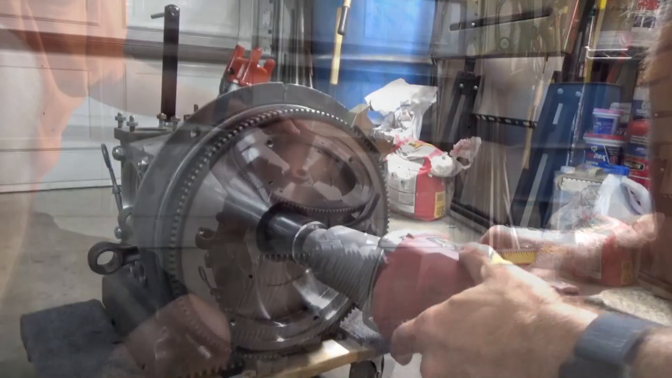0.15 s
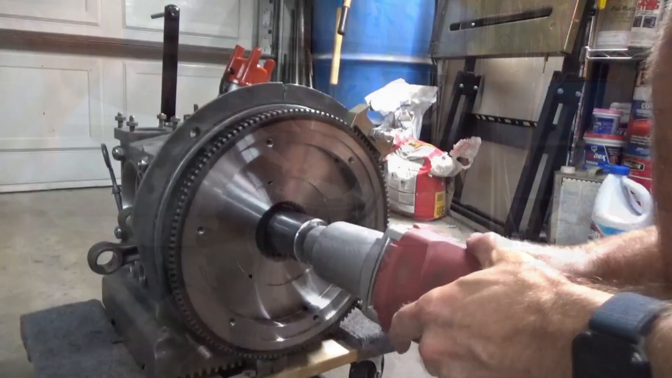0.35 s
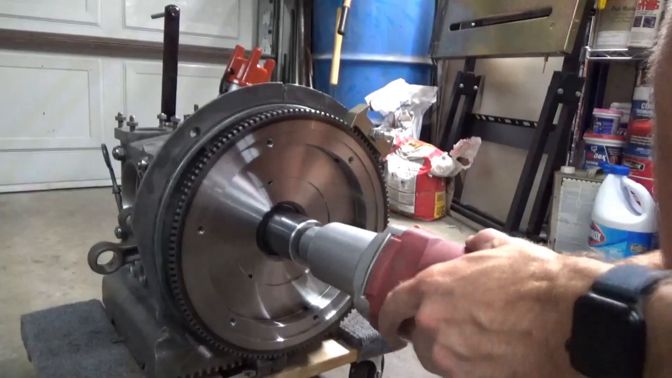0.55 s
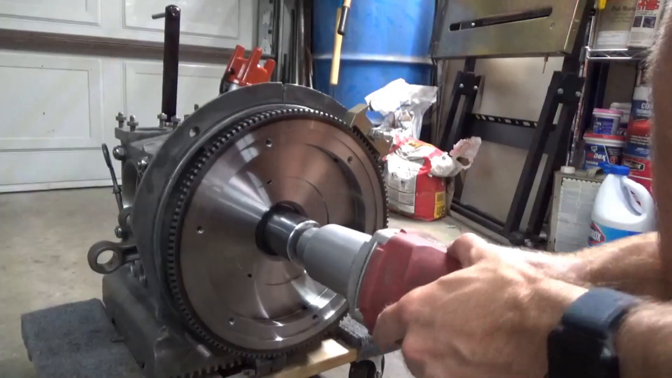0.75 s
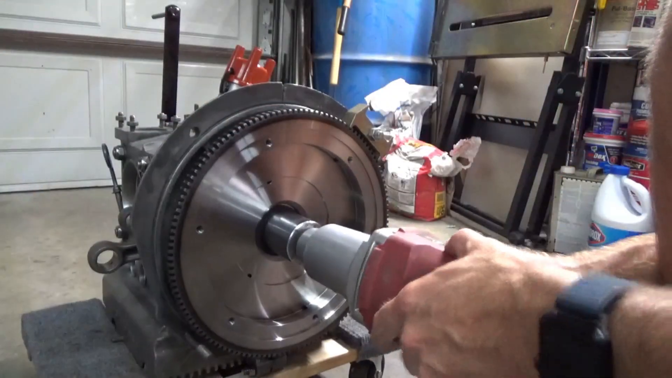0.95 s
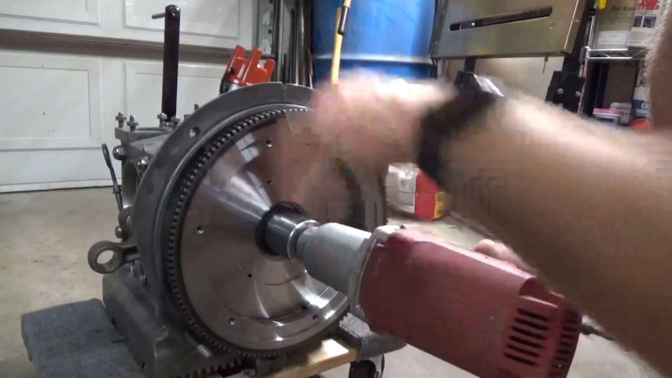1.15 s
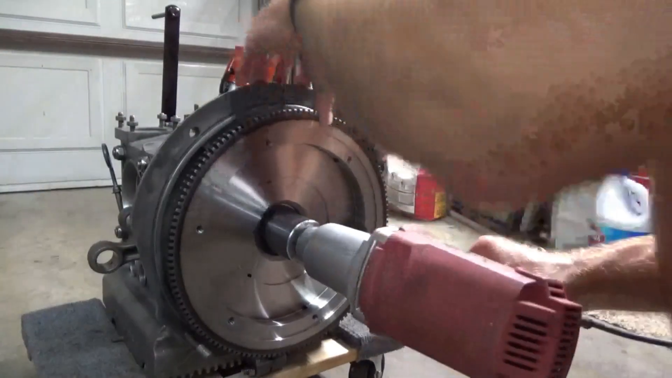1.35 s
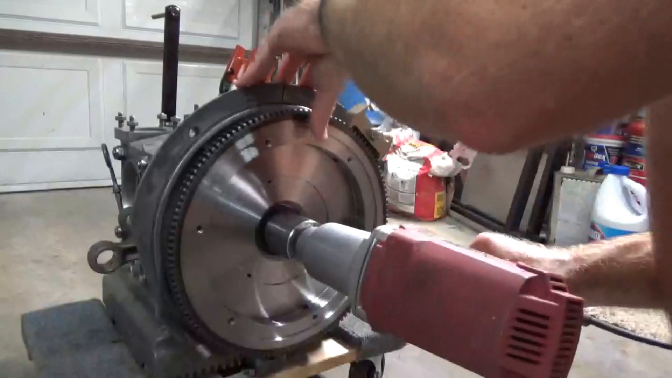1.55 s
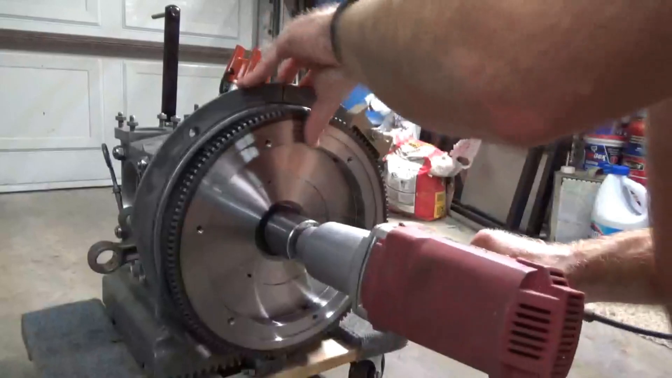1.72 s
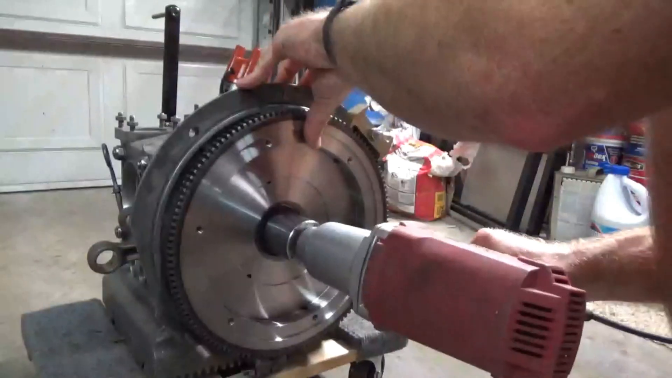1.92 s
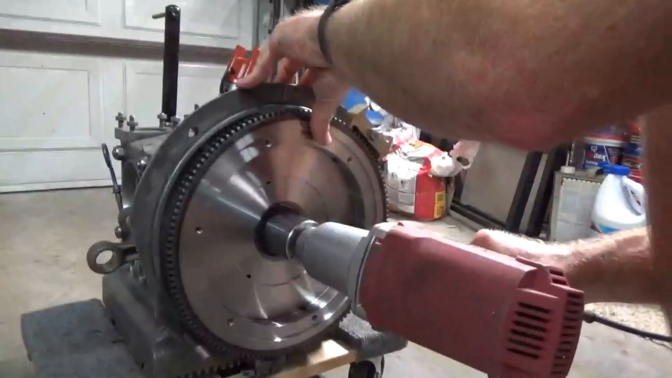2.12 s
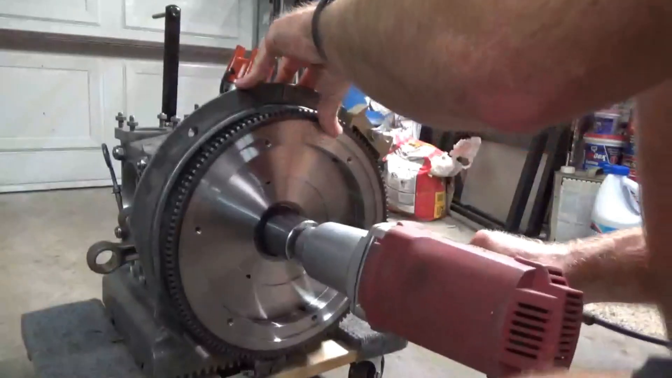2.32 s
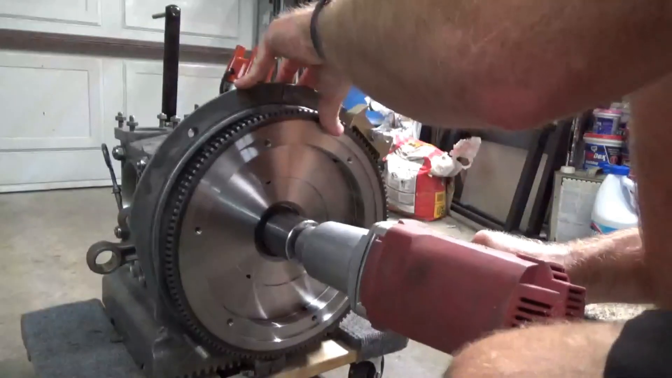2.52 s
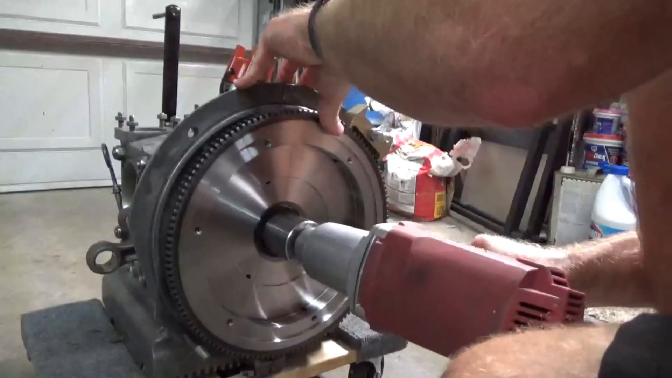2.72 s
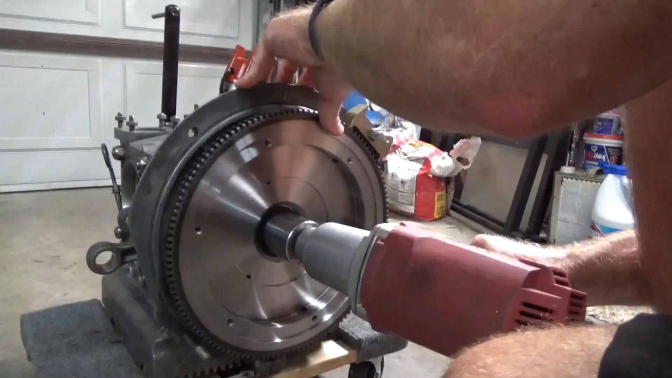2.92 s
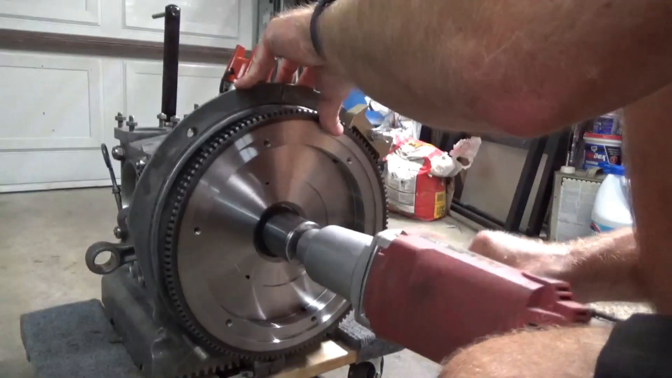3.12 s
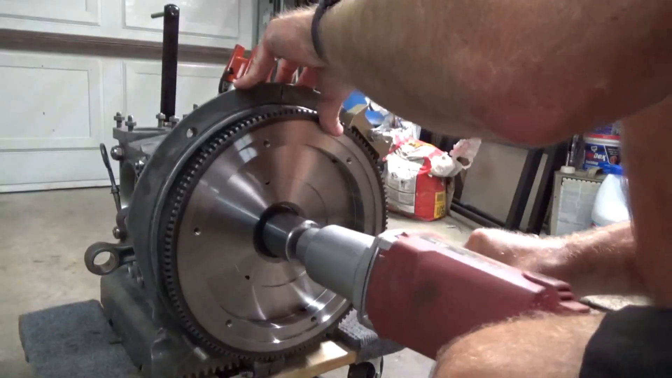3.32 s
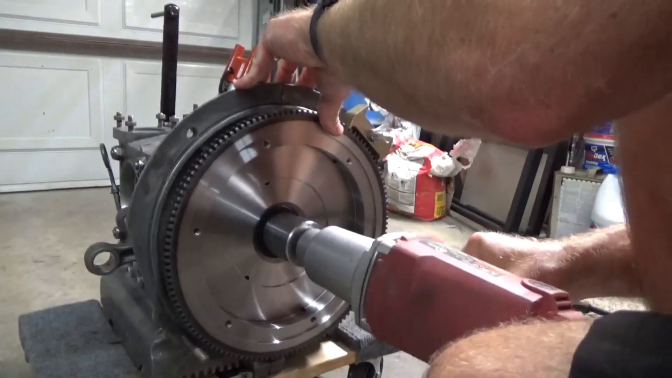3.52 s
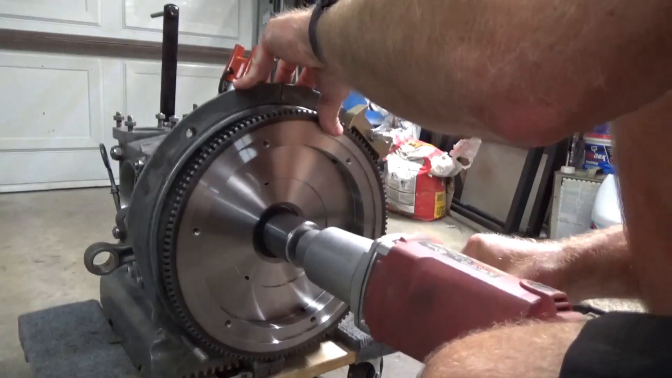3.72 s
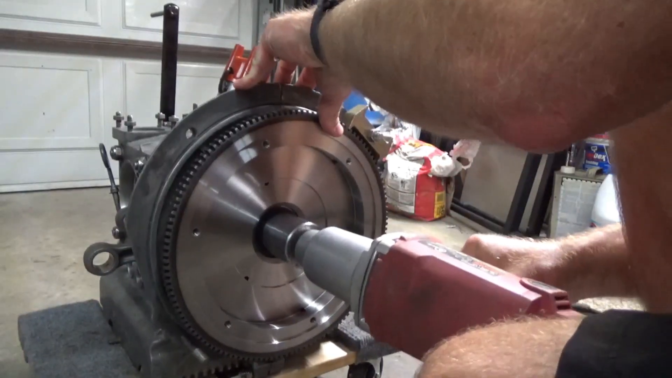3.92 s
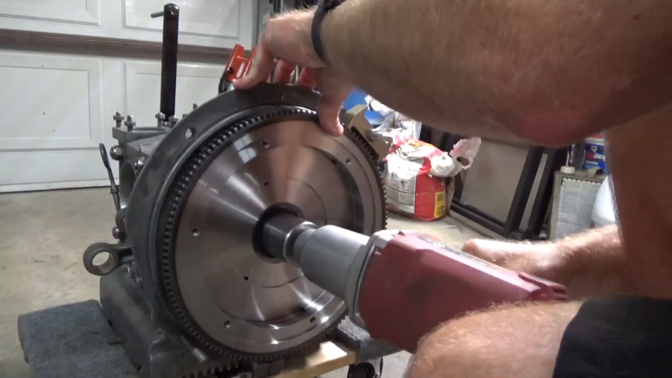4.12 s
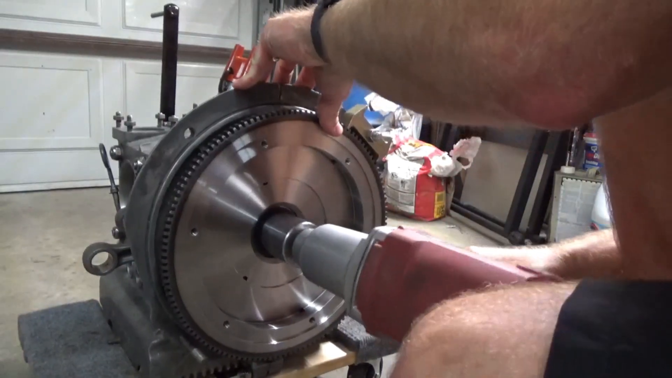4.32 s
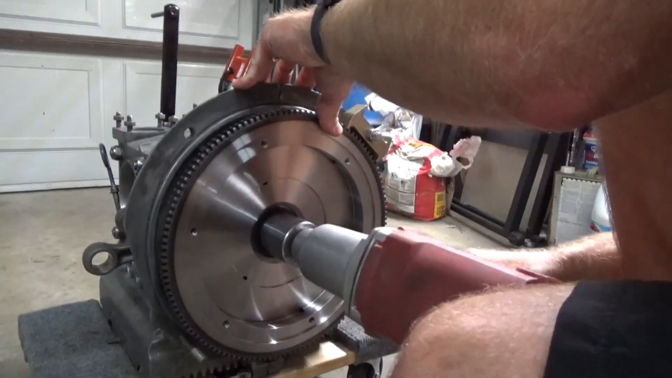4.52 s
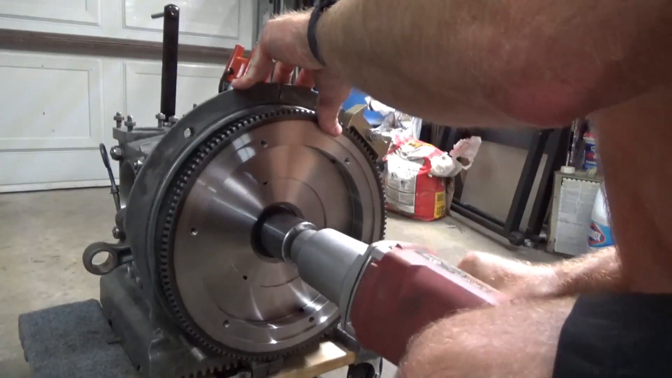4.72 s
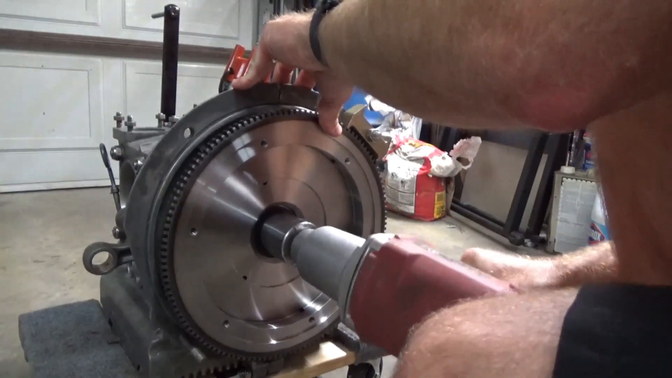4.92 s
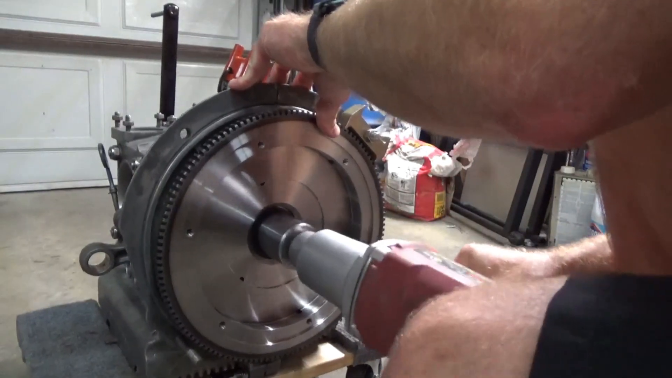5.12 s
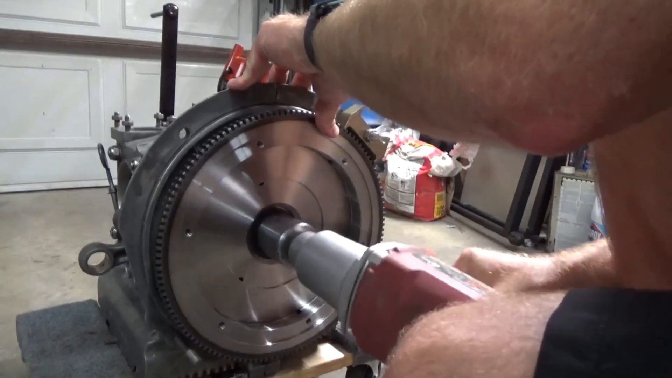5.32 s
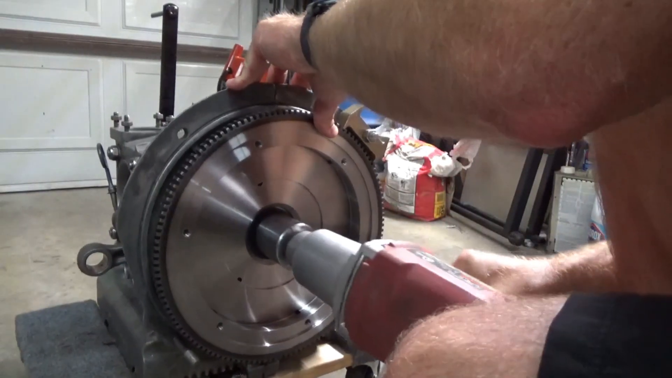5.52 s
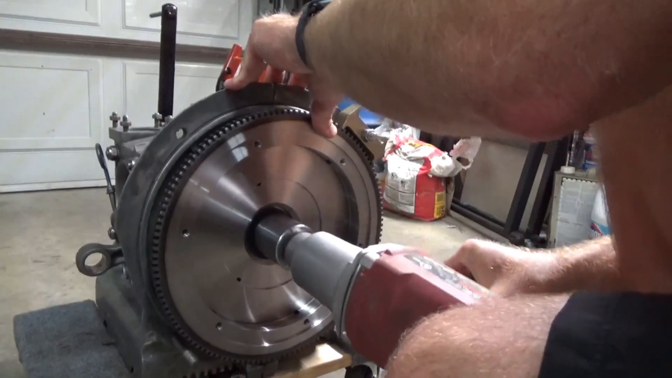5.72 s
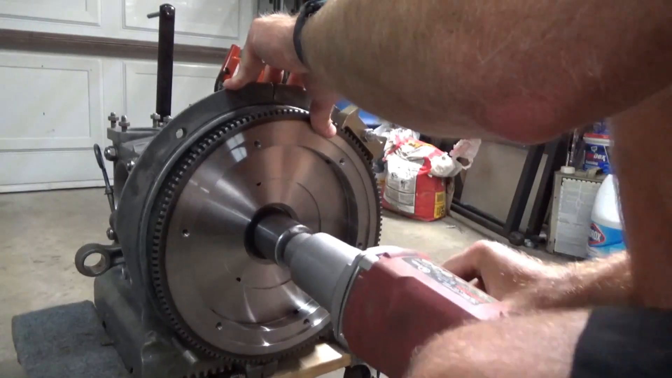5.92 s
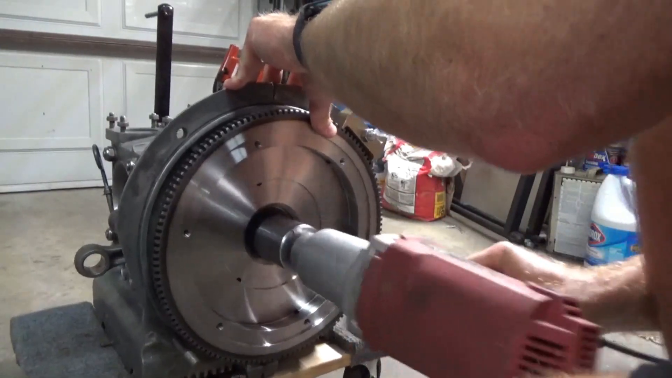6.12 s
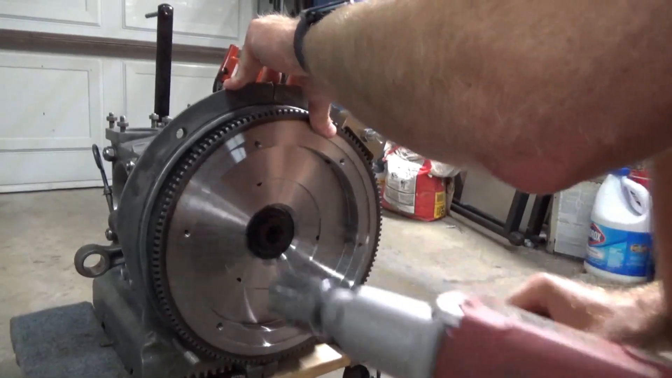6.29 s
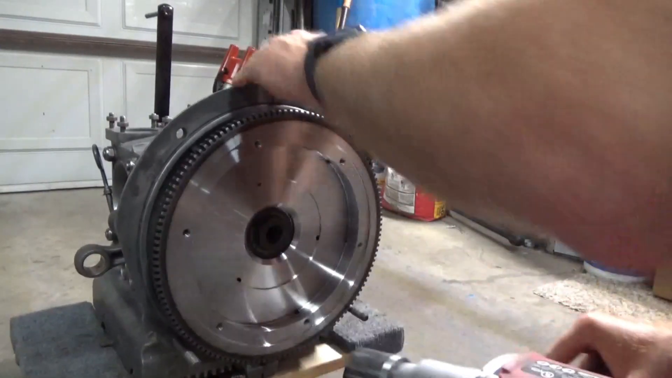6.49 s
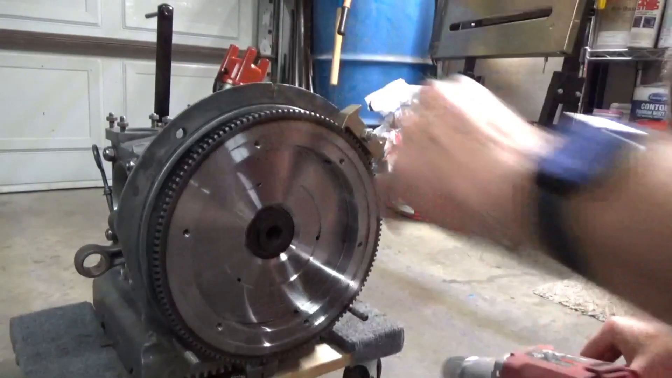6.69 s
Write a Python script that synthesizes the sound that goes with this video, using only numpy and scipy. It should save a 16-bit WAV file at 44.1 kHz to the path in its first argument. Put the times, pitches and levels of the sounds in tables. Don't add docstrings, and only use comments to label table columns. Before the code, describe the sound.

A stereo pickup close to the work in a hard-walled garage. Room air and a faint far-off compressor hum fade up. From 0 to 0.55 seconds small, dull steel clinks tick irregularly, with brief grating; at 0.57 the socket drops home with a bright, ringing double clack. Faint taps and soft skin-on-metal rubs follow around 1.0 to 1.5, scattered knocks to 1.9, then near quiet with tiny touches at 2.5. At 3.1 an impact wrench erupts: irregular catches, then harsh, even hammering at about 45 blows a second until 4.17, with motor rush, bright chatter and bassy shudder. Blows spread out and die by 4.55. A second burst starts at 4.94, hammers to 5.3 and slows to single clacks by 5.66. The background stays ducked. Short garage echoes fade while light clinks at 5.8 to 6.2 mark the tool's removal, with a last small tap at 6.68.

```python
import sys
import numpy as np
from scipy import signal
from scipy.fft import rfft, irfft
from scipy.io import wavfile
from scipy.ndimage import uniform_filter1d, minimum_filter1d

SR = 44100
rng = np.random.default_rng(int(sys.argv[2]) if len(sys.argv) > 2 else 0)


def gain_from_db(level_db):
    decades = np.asarray(level_db, float) / 20
    return 10 ** decades


def wav_out(sig):
    wavfile.write(sys.argv[1], SR, np.round(np.clip(np.atleast_2d(sig).T, -1, 1) * 32767).astype(np.int16))


N = 297664


def rms_one(x):
    return x / np.sqrt(np.mean(x ** 2) + 1e-20)


def curve(rows, outside=None):
    s, value = np.transpose(rows)
    return np.interp(np.arange(N) / SR, s, value, outside, outside)


def at_hz(points, hz, axis=1):
    return np.interp(np.log(hz + 1), np.log(np.array(points)[:, 0]), np.array(points)[:, axis])


def coloured(white, spectrum):
    gain = gain_from_db(at_hz(spectrum, np.fft.rfftfreq(N, 1 / SR)))
    return rms_one(irfft(rfft(white) * gain, N))


def drift(rate_hz):
    r = np.exp(-2 * np.pi * rate_hz / SR)
    white = rng.standard_normal(N + SR)
    return rms_one(signal.lfilter([1], [1, -2 * r, r * r], white)[SR:])


def band(x, low_hz, high_hz):
    return signal.sosfilt(signal.butter(3, [low_hz, high_hz], "band", fs=SR, output="sos"), x)


def soft_band(x, low_hz, high_hz):
    return signal.sosfilt(signal.butter(2, [low_hz, high_hz], "band", fs=SR, output="sos"), x)


def two_sides(mid, side, alike):
    return np.sqrt(1 + alike) * mid + np.sqrt(1 - alike) * side * [[1], [-1]]


def ring(force, hz, t60_s):
    r, w = gain_from_db(-60 / (t60_s * SR)), 2 * np.pi * hz / SR
    return signal.lfilter([0, np.sin(w)], [1, -2 * r * np.cos(w), r * r], force + 1e-18)


def ring_all(force, modes):
    return sum(gain_from_db(db) * ring(force, hz, t60_s) for hz, db, t60_s in modes)


def taps_at(s):
    return np.round(s * SR).astype(int)


def contacts(hits, level_db, fade_ms, kick):
    rise_ms = 0.4
    out, ms = np.zeros(N + 2000), np.arange(2000) / SR * 1000
    for (s, *_, hold_ms), db in zip(hits, level_db):
        hold = np.exp(-np.maximum(ms - hold_ms, 0) / fade_ms)
        shape = hold + kick * np.exp(-ms / 2.3)
        start = round(s * SR)
        out[start:start + 2000] += gain_from_db(db) * shape * -np.expm1(-ms / rise_ms)
    return out[:N]


def struck(hits, share_db, modes, fade_ms, spread_db):
    luck = spread_db * rng.standard_normal((len(hits), len(modes)))
    rattle = rng.standard_normal(N)
    rung = 0
    for k, (hz, db, t60_s) in enumerate(modes):
        level_db = hits[:, 1] + share_db + db + luck[:, k]
        rung = rung + ring(rattle * contacts(hits, level_db, fade_ms, kick=2.0), hz, t60_s)
    return rung


def recorder_gain():
    open_db, fade_in_s, fade_in_db = 8.5, 0.58, 5.5
    duck_s, duck_db, recover_db_per_s = 3.1, 33, 2
    end_s = N / SR
    end_db = recover_db_per_s * (end_s - duck_s) - duck_db
    return gain_from_db(open_db + curve([(0, -fade_in_db), (fade_in_s, 0), (duck_s, 0),
                                (duck_s + .1, -duck_db), (end_s, end_db)]))


# pitch_hz, level_db (per Hz)
AIR = [(15, -28.5), (25, -13), (69, -1.5), (160, -10.5), (197, -5.5), (274, -9.5), (412, -7.5), (1300, -20),
       (1430, -21), (1630, -22), (2640, -18.5), (11000, -30.5), (14300, -79), (22000, -120)]
# pitch_hz, likeness (0 to 1)
LIKENESS = [(60, 0.64), (170, 1), (500, 0.63), (1420, 0.35), (4090, 0.3), (11700, 1)]
# pitch_hz, level_db (rms)
HUM = [(96.9, -76), (193.8, -65.5), (344.5, -79.5)]


def background():
    mid, side = rfft(rng.standard_normal((2, N)))
    hz = np.fft.rfftfreq(N, 1 / SR)
    pair = two_sides(mid, side, np.clip(at_hz(LIKENESS, hz), 0, .99))
    air_db = -62.5 + 1.2 * drift(6)
    air = gain_from_db(air_db) * rms_one(irfft(pair * gain_from_db(at_hz(AIR, hz)), N))
    turns = np.cumsum(1 + .004 * drift(3)) / SR
    waver_db = .9 * drift(8)
    hum = sum(np.sqrt(2) * gain_from_db(db + waver_db) * np.sin(2 * np.pi * line_hz * turns) for line_hz, db in HUM)
    return recorder_gain() * (air + hum)


# start_s, level_db (peak), low_share_db, high_share_db
FITTING = [(0.001, -38, 6.5, -8), (0.069, -42.5, 4.5, -1), (0.208, -44.5, 12.5, -1), (0.213, -40, -2, 0),
           (0.269, -69, 21, -1), (0.311, -68, 22, -9), (0.409, -61.5, 20.5, 8), (0.471, -57, 25.5, 4),
           (0.498, -41, 13.5, 6), (0.512, -51, 24, 7), (0.535, -48.5, 21.5, 7), (0.551, -64, 17, 6),
           (0.5738, -15.5, 4, -3.5), (0.5783, -18.5, 3.5, -3.5), (0.82, -44.5, 3, 3), (1.015, -52, 13, -7),
           (1.182, -53, 2.5, -10), (1.208, -49, 10, -5), (1.224, -51, 10, 3), (1.245, -53, 5, -7),
           (1.263, -51.5, 9.5, -1), (1.379, -52, 0, 0), (1.484, -43.5, -1, 2.5), (1.854, -46.5, -1, 3),
           (1.895, -43, -13, -10), (2.505, -47.5, 9, -7), (2.595, -70, 1, 15), (2.712, -70, 4, -5.5)]
# start_s, level_db (peak), low_share_db, high_share_db
PUTTING_DOWN = [(5.835, -40, -3, -4), (5.952, -43.5, -5, -1), (5.969, -33, -2, -3.5), (5.973, -39, -10, 11),
                (6.062, -61, 9, -3), (6.097, -49.5, -21, 4), (6.117, -53, -1, 3), (6.192, -63, -3, -14),
                (6.215, -65, -2.5, -8), (6.269, -66.5, -1, -14), (6.342, -76.5, 12.5, -8),
                (6.373, -81, 13, -1), (6.678, -53, -4, -1)]
# pitch_hz, level_db, t60_s
FLYWHEEL = [(775, -17, .05), (866, -6, .07), (900, -1, .065), (948, -2, .06), (1270, -10, .04),
            (1700, -6, .04), (1830, -5, .04), (1950, -7, .05), (2126, -6, .06), (2545, -6, .03)]
# pitch_hz, level_db, t60_s
SOCKET = [(3380, -6, .018), (3520, -7, .02), (4190, -17, .015), (4530, -11, .03), (5230, -11, .02),
          (6010, -8, .015), (6760, -6, .02), (7000, -5, .02), (7220, -5, .022), (7625, -5, .025),
          (9100, -4, .012), (9960, -8, .015)]
# start_s, level_db
SCRAPE = [
    (.468, -48),
    (.52, -47.5),
    (.575, -36.5),
]


def clinks():
    s, db, low_db, high_db = np.transpose(FITTING + PUTTING_DOWN)
    contact_ms = 3.4
    hits = np.c_[s, db, low_db, 0 * s, high_db, contact_ms + 0 * s]
    white = rng.standard_normal(N)
    crack = 0
    for k, (low_hz, high_hz, colour_db) in enumerate([(702, 1760, 3.5), (2170, 4500, 4.0), (4420, 8450, -0.5)]):
        force = contacts(hits, hits[:, 1] + hits[:, 2 + k] + colour_db, fade_ms=1.6, kick=0.37)
        crack = crack + band(white[::-1] * force, low_hz, high_hz)
    low = struck(hits, low_db - 42, FLYWHEEL, fade_ms=1.5, spread_db=3.0)
    high = struck(hits, high_db - 41, SOCKET, fade_ms=1.2, spread_db=2.0)
    grating = ring(white, 900, 0.028) + 0.38 * ring(white, 2000, .012) + 0.55 * ring(white, 1500, .01)
    scrape = rms_one(grating) * gain_from_db(curve(SCRAPE, -120) + 1.8 * drift(120))
    return band(crack, 335, 15000), band(low + high, 324, 17000) + scrape


def snaps():
    s, db, low_db, high_db = np.transpose(FITTING + PUTTING_DOWN)
    to_room_db = 23
    taps = np.zeros((3, N))
    colour_db = np.array([low_db + 5.5, 0 * s + 6.3, high_db + 1.5])
    taps[:, taps_at(s)] = gain_from_db(db + to_room_db + colour_db)
    return band(taps[0], 750, 2150) - band(taps[1], 2200, 4600) - band(taps[2], 5800, 9800)


# start_s, pitch_hz, level_db, t60_s
NOTES = [(.072, 900, -46, .04), (.207, 780, -45, .04), (.2, 7100, -52, .04), (0.073, 143, -35, 0.036),
         (0.5, 5240, -41, 0.026), (0.536, 7070, -48, 0.3), (0.574, 7150, -43, .3), (.575, 6950, -36, .1),
         (.575, 2030, -31, 0.5), (.576, 7200, -22, .03), (.576, 8300, -25, .04), (.576, 3745, -33, .25),
         (.576, 2144, -33, 0.5), (.576, 4200, -34, .22), (.575, 2980, -35, .2), (.575, 1720, -27, 0.25),
         (.577, 1950, -28, 0.3), (.575, 860, -32, 0.3), (.576, 900, -35, 0.42), (1.38, 2580, -57, .1),
         (1.405, 2560, -57, .1), (1.422, 2700, -57, .08), (1.4, 3000, -57, .2), (1.41, 6750, -61, .5),
         (3.171, 6600, -12, .02), (4.315, 4600, -15, .05), (4.367, 5250, -14, .03), (4.379, 4650, -13, .04),
         (4.381, 5250, -15, .035), (2.48, 2000, -46, 0.015), (2.506, 878, -44, 0.07),
         (1.014, 900, -48, .05), (3.105, 2545, -19, .04), (3.128, 1750, -20, .06), (4.548, 249.3, -66, 1.6),
         (4.552, 7130, -10, 0.028), (5.645, 6950, -11, .04), (5.664, 6950, -10, .035),
         (5.665, 250, -67, 2.4), (5.67, 6950, -45, 0.55), (5.67, 5230, -44, .4), (5.666, 4540, -44, .5),
         (5.751, 413, -65, 1.8), (5.968, 4554, -62, 0.4), (5.97, 8420, -31, 0.035), (6.18, 6930, -77, 0.9),
         (6.679, 6880, -68, 1.0), (6.679, 1610, -74, 0.26)]


def notes():
    rung = 0
    for s, hz, db, t60_s in NOTES:
        click = gain_from_db(db) * (np.arange(N) == round(s * SR))
        rung = rung + band(ring(click, hz, t60_s), hz / 2, 2 * hz)
    return rung * gain_from_db(3.0 * drift(45))


# pitch_hz, t60_s, level_db, likeness (left to right, 0 to 1)
GARAGE = [(150, 0.2, -4, 0.36), (398, 0.51, 6, .1), (940, 0.53, -1, 0.6), (2540, 0.51, -3, 0.67),
          (5800, 0.51, -5, 0.37), (10800, 0.42, -9, 0.19)]


def garage(x, first_ms):
    t, edges_hz = np.arange(SR) / SR, 88 * 2 ** np.arange(0, 7.6, .5)
    white, pair = rng.standard_normal((2, 2, SR)), 0
    for k, (low_hz, high_hz) in enumerate(zip(edges_hz, edges_hz[1:])):
        mid, side = soft_band(white[k % 2], low_hz, high_hz)
        hz = np.sqrt(low_hz * high_hz)
        alike = np.clip(at_hz(GARAGE, hz, axis=3), 0, .95)
        fading = gain_from_db(at_hz(GARAGE, hz, axis=2) - 60 * t / at_hz(GARAGE, hz))
        pair = pair + fading * two_sides(mid, side, alike)
    pair = pair * np.clip(t * 1000 / first_ms - 1, 0, 1)
    return signal.fftconvolve(x[None], pair, axes=1)[:, :N]


# start_s, swell_s, fade_s, level_db (top)
RUBS = [
    (1.0, 0.067, 0.032, -45),
    (1.09, 0.025, 0.02, -49),
    (1.37, 0.024, 0.055, -54),
]
# pitch_hz, level_db (per Hz)
RUB = [(880, -42), (1500, -10.5), (1990, -3), (2290, -7.5), (8420, 0), (11000, -5.5), (14300, -24.5),
       (22000, -120)]


def rubs():
    edge_db, strokes = 11.5, 0
    for s, swell_s, fade_s, db in RUBS:
        top_s = s + swell_s
        strokes = strokes + gain_from_db(curve([(s, db - edge_db), (top_s, db), (top_s + fade_s, db - edge_db)], -120))
    return coloured(rng.standard_normal(N), RUB) * gain_from_db(4.3 * drift(60)) * strokes


# start_s (motor on), rise_s, let_go_s, standstill_s, level_db (rush)
PULLS = [
    (3.097, 0.03, 4.1, 4.58, -22),
    (4.94, 0.06, 5.33, 5.67, -24.5),
]


def running():
    surge_s, surge_db, rundown_db = .05, 0, 20.5
    gain = 0
    for on, rise_s, off, stop, db in PULLS:
        up = on + rise_s
        gain = gain + gain_from_db(curve([(on, db - 24), (up, db + surge_db), (up + surge_s, db + surge_db),
                                 (up + 2 * surge_s, db), (off, db), (stop, db - rundown_db)], -120))
    return gain


def shudder():
    both, left, right = band(rng.standard_normal((3, N)), 35, 490)
    lumps = gain_from_db(4.0 * drift(30))
    return gain_from_db(14.0) * running() ** 1.98 * lumps * (both + 0.55 * np.array([left, right]))


# start_s, level_db (peak), flywheel_share_db,
# socket_share_db, chatter_ms
CATCHES = [(3.1043, -10, -16, -39.5, 2.5), (3.11, -10, -19, -19.5, 2.2), (3.1173, -12, -9.5, -18.5, 4.5),
           (3.125, -11, -13.5, -26.5, 18), (3.1465, -9.5, -21.5, -27, 1.5), (3.151, -11.5, -9, -17.5, 5),
           (3.158, -10, -27, -20, 5), (3.169, 0, -28, -14, 3.5), (3.179, -9, -27.5, 1.5, 4),
           (3.192, -9.5, -26.5, -10, 3), (3.2049, 0.5, -27, 5.5, 6), (5.647, -14, -28, -11.5, 5.5),
           (4.41, -18.5, -7.5, -17.5, 12), (4.9462, -33, -6, -23.5, 8), (4.9731, -14, -13.5, -24, 6.8),
           (4.989, -15.5, -17.5, -38.5, 1.5), (5.008, -19, -22, -13, 2.4), (5.0155, 2.5, -27.5, -12.5, 4.2),
           (5.027, -17.5, -39, -1.5, 5.9), (5.049, 0, -19.5, 3.5, 9.5)]
# start_s, level_db (peak), flywheel_share_db, socket_wall_share_db, collar_share_db
SPINNING_ON = [(3.2369, -2.5, -18, -9, -14.5), (3.2644, -1.5, -21, -7.5, -16),
               (3.2896, 0.5, -24, -6.5, -18.5), (3.3165, -4, -18, -5, -19.5), (3.3387, -1, -22.5, -15, -21),
               (3.3644, 0, -19, -9, -12), (3.3881, -2.5, -23.5, -13.5, -11.5),
               (3.4104, -4, -17, -12.5, -18), (3.4331, -2.5, -21.5, -7, -12), (3.4564, -1.5, -24, -14, -15),
               (3.4794, -3, -22, -14, -11), (3.5023, -2.5, -14.5, -14, -15.5),
               (3.5244, -5.5, -21, -11, -16), (3.5469, -3.5, -19, -15, -12), (3.5688, -4, -21, -14, -19.5),
               (3.591, 0, -16, -12, -13), (3.6141, -4.5, -17.5, -13, -16), (3.6356, -2, -26, -15.5, -9.5),
               (3.6578, -1, -22.5, -15, -7.5), (3.6801, -5, -21, -14.5, -9.5),
               (3.7034, -4.5, -22.5, -12.5, -12.5)]
DRIVING_HOME = [(3.725, -4, -17, -15, -14), (3.7468, -1, -16, -15, -14), (3.7675, -3.5, -21.5, -13, -14.5),
                (3.7924, -2.5, -21, -11.5, -12.5), (3.813, -1.5, -15, -11.5, -13),
                (3.8357, -6, -25, -18, -13.5), (3.8598, -4.5, -19, -11.5, -16.5),
                (3.8809, -5, -24.5, -9, -12), (3.903, -2.5, -20.5, -17, -11.5),
                (3.926, -5.5, -21.5, -13.5, -10.5), (3.9461, -4, -14, -16, -16),
                (3.9673, -4, -18.5, -14.5, -16.5), (3.9907, -2.5, -24.5, -16.5, -17),
                (4.0131, -4, -18, -15, -13), (4.0343, -5.5, -27, -15.5, -19),
                (4.0565, -3.5, -24, -18.5, -15.5), (4.077, -4.5, -19, -17, -12.5),
                (4.101, -3, -24, -14.5, -12), (4.1229, -7, -20.5, -18, -17), (4.148, -4, -20, -16, -14),
                (4.1748, -1, -21, -12, -10)]
SECOND_PULL = [
    (5.079, -3, -22, -13, -20),
    (5.1058, -3, -24.5, -11.5, -17.5),
    (5.1307, -6, -24.5, -15.5, -17),
    (5.1552, -3.5, -30.5, -14.5, -14),
    (5.1789, -4.5, -22.5, -17.5, -16),
    (5.2013, -5.5, -24.5, -15, -8.5),
    (5.2237, -5, -26, -15, -14),
    (5.2474, -3, -32.5, -6, -15),
    (5.2729, -4, -20.5, -8.5, -16),
    (5.2951, -4, -20.5, -9.5, -13.5),
]
# start_s, loss_db
BITE = [
    (3.24, 12),
    (3.5, 16.5),
    (4.17, 14.5),
    (5.08, 5.5),
    (5.3, 6),
]
# start_s, level_db (peak), socket_share_db, bounce_after_ms, bounce_loss_db
COASTING = [(4.2044, 2.5, -16.5, 11, 13), (4.2373, -2.5, -4, 11, 10.5), (4.272, -2.5, -15, 12, 2),
            (4.3137, 1.5, -4.5, 12.5, 15.5), (4.3625, -3.5, -5.5, 15, 6), (4.4232, -10, -18, 19.6, -6.5),
            (4.4842, -27, -22, 11, 13), (4.5186, -10, -29, 23, 5), (4.551, -14, -25.5, 4.7, 1),
            (5.322, -2.5, -7, 8.8, -4), (5.3509, -2.5, -17, 11, 8), (5.3842, -2.5, -1.5, 10, 1.5),
            (5.4185, -1.5, 3.5, 6.8, -6), (5.4584, -3, -1, 10, 0), (5.504, -4, -1.5, 11, -3),
            (5.5617, -5.5, 1.5, 11.8, -5.5), (5.6364, -10, -15.5, 6.5, 8), (5.661, -10.5, -6.5, 9.9, 31)]


def blows():
    s, db, wheel_db, wall_db, _ = np.transpose(SPINNING_ON + DRIVING_HOME + SECOND_PULL)
    luck = rng.standard_normal((len(s), 4))
    even_db = db + 3.5 + .5 * luck[:, 0]
    even = np.c_[s, even_db, wheel_db, wall_db + 4.5, 5 + luck[:, 1]]
    at, coast_db, socket_db, after_ms, coast_loss_db = np.transpose(COASTING)
    coast = np.c_[at, coast_db, -22.5 + 0 * at, socket_db, 6.1 + 0 * at]
    main = np.r_[even, coast]
    bounce = main.copy()
    bounce_ms = 9.5 + 1.0 * luck[:, 2]
    loss_db = np.interp(s, *np.transpose(BITE)) + 3.0 * luck[:, 3]
    bounce[:, 0] += np.r_[bounce_ms, after_ms] / 1000
    bounce[:, 1] -= np.r_[loss_db, coast_loss_db]
    bounce[:, 4] = 2.2
    return np.r_[main, bounce, CATCHES]


# pitch_hz, level_db (per Hz)
CHATTER = [(180, -45.5), (300, -13.5), (764, -44.5), (888, -1), (1400, -6), (1750, -1.5), (2920, -2.5),
           (3450, -0.5), (5580, -1), (8390, 2), (11000, -2), (14300, -29), (22000, -120)]


def wrench(hits):
    grit = rng.standard_normal(N) * gain_from_db(0.55 * drift(260))
    chatter = coloured(grit, CHATTER) * contacts(hits, hits[:, 1] - 7.5, fade_ms=1.26, kick=0.59)
    wheel = struck(hits, hits[:, 2] - 29, FLYWHEEL, fade_ms=0.64, spread_db=1.5)
    socket = struck(hits, -40.5, SOCKET, fade_ms=0.57, spread_db=5.5)
    motor = coloured(rng.standard_normal(N), CHATTER) * running() * gain_from_db(2.0 * drift(150))
    return band(chatter + wheel + motor, 700, 19000) + socket


# pitch_hz, level_db, t60_s
SOCKET_WALL = [(8270, -6, .016), (8405, -1, .018), (8560, -8, .012)]


def socket_wall(hits):
    taps = np.zeros(N)
    taps[taps_at(hits[:, 0])] = gain_from_db(hits[:, 1] + hits[:, 3] + 11)
    return band(ring_all(taps, SOCKET_WALL), 520, 8300)


# pitch_hz, level_db, t60_s
ANVIL = [(4523, -18.5, 0.041), (5290, -14, .025), (7230, -14.5, 0.045)]
# start_s, level_db
TIGHTENING = [
    (3.1, -11),
    (4.1, -5),
    (4.3, -3),
    (5.7, 6.5),
]


def anvil(hits):
    taps, luck = np.zeros((len(ANVIL), N)), rng.standard_normal((len(hits), len(ANVIL)))
    signs = np.sign(luck.T[::-1])
    taps[:, taps_at(hits[:, 0])] = gain_from_db(hits[:, 1] + 5 * luck.T) * signs
    clearer = gain_from_db(curve(TIGHTENING))
    rung = sum(gain_from_db(db) * ring(tap * clearer, hz, t60_s) for tap, (hz, db, t60_s) in zip(taps, ANVIL))
    return band(rung, 2500, 17000)


# start_s, level_db
JOLTS = [(3.113, -10), (3.456, 12), (3.503, 7), (3.571, 2), (3.615, -11), (3.691, -11), (3.77, 5.5),
         (3.86, -9), (3.885, 0), (3.95, -7.5), (3.995, -4.5), (4.1, -4.5), (4.239, -4), (5.201, -4),
         (5.27, -4.5), (5.42, 0.5), (5.5, -11), (5.56, -5), (5.66, -18)]


def jolts():
    taps = np.zeros(N)
    for s, db in JOLTS:
        taps[round(s * SR)] = gain_from_db(db)
    return gain_from_db(12.5) * soft_band(taps, 60, 330) * gain_from_db([[.6], [-.6]])


# pitch_hz, level_db, t60_s
COLLAR = [(6810, 1, .018), (6880, -8, .015), (7250, -6.5, .018)]


def collar():
    s, db, *_, collar_db = np.transpose(SPINNING_ON + DRIVING_HOME + SECOND_PULL)
    taps = np.zeros(N)
    taps[taps_at(s) + 40] = gain_from_db(db + 1.4 * collar_db + 15.5)
    return band(ring_all(taps, COLLAR), 4000, 10000)


def scene():
    hits = blows()
    crack, rings = clinks()
    spread = wrench(hits) + rings + rubs()
    beamed = socket_wall(hits) + collar() + notes() + anvil(hits)
    echoes = garage(spread + snaps() + gain_from_db(-9) * beamed, first_ms=4.0)
    close = (spread + crack + beamed) * gain_from_db([[-.1], [.1]])
    return close + gain_from_db(-37.5) * echoes + shudder() + jolts() + background()


def roll_off(x):
    return signal.sosfilt(signal.butter(12, 12340, fs=SR, output="sos"), x)


def record(dry):
    limit_db, cutoff_hz, knee, squash = -4.0, 11330, 0.62, 0.8
    peak = np.abs(dry).max(axis=0)
    room_left = minimum_filter1d(np.minimum(1, gain_from_db(limit_db) / (peak + 1e-9)), size=45)
    limited = dry * uniform_filter1d(room_left, size=31)
    bent = limited + .001 * limited ** 2
    steady = signal.sosfilt(signal.butter(1, 40, "high", fs=SR, output="sos"), bent)
    cut = signal.sosfilt(signal.cheby2(22, 62, cutoff_hz, fs=SR, output="sos"), steady)
    rounded = cut - squash * np.sign(cut) * np.maximum(np.abs(cut) - knee, 0) ** 2
    return roll_off(rounded)


dry = scene()
out = record(dry)
wav_out(out)
```